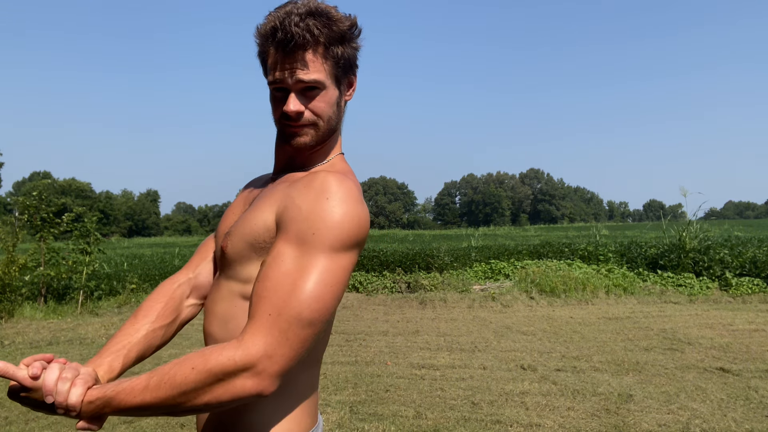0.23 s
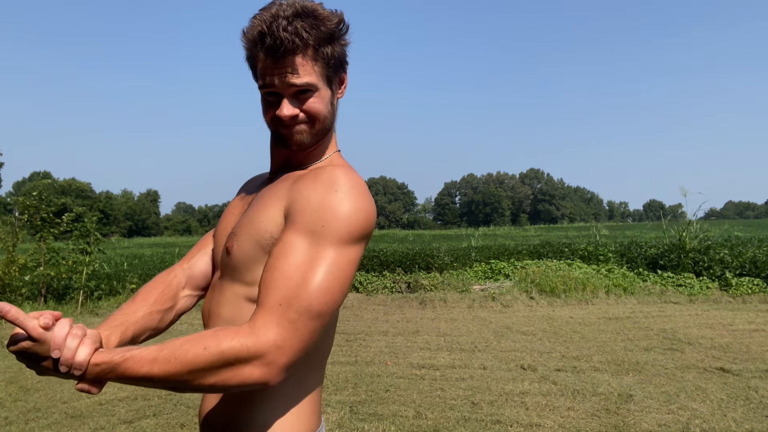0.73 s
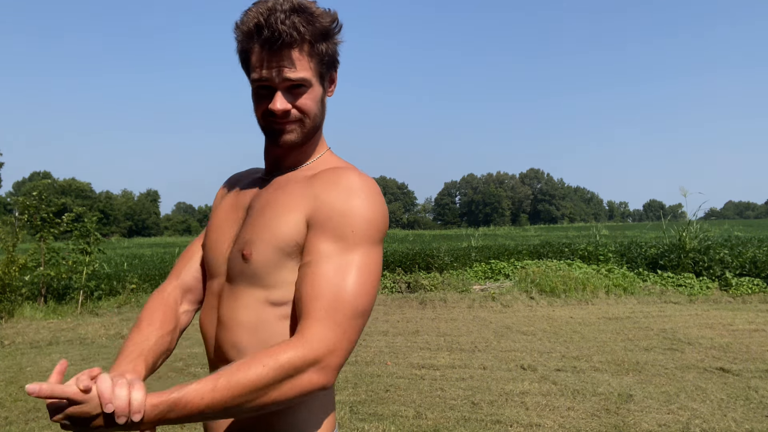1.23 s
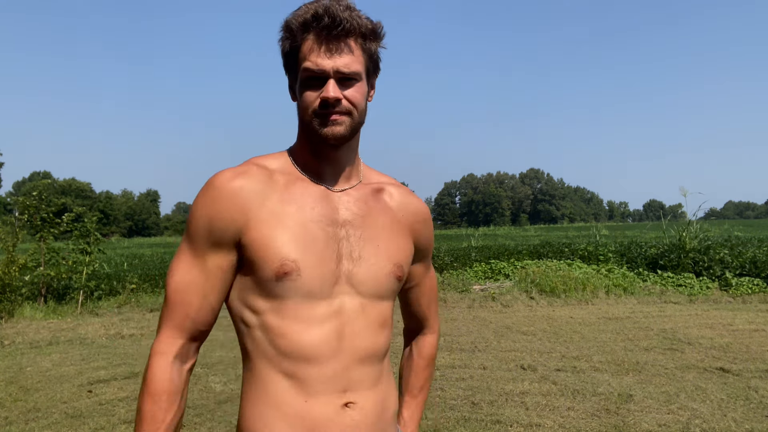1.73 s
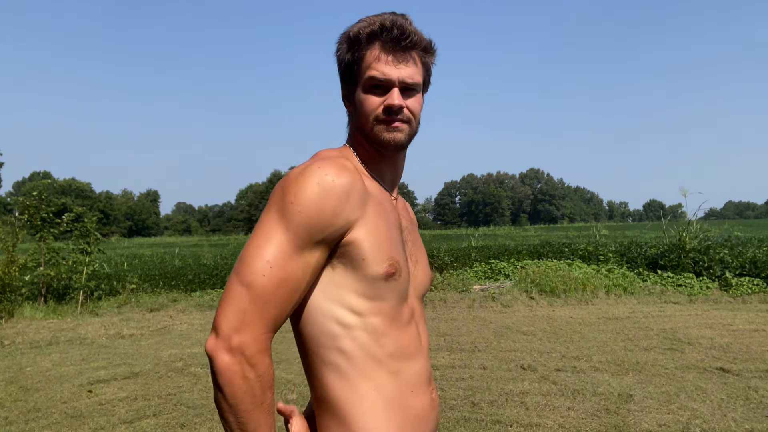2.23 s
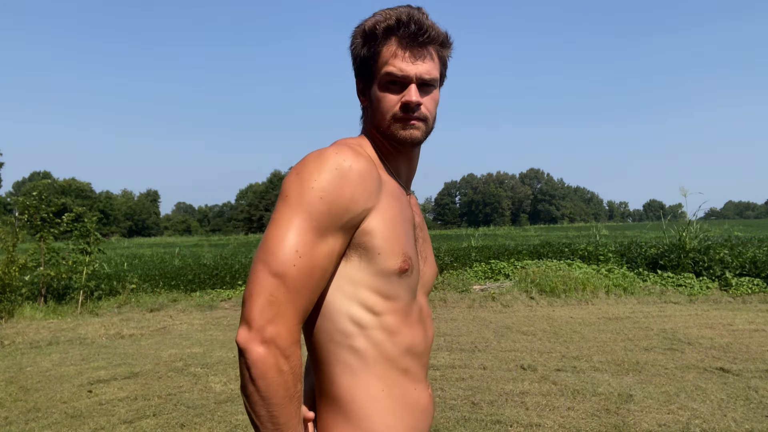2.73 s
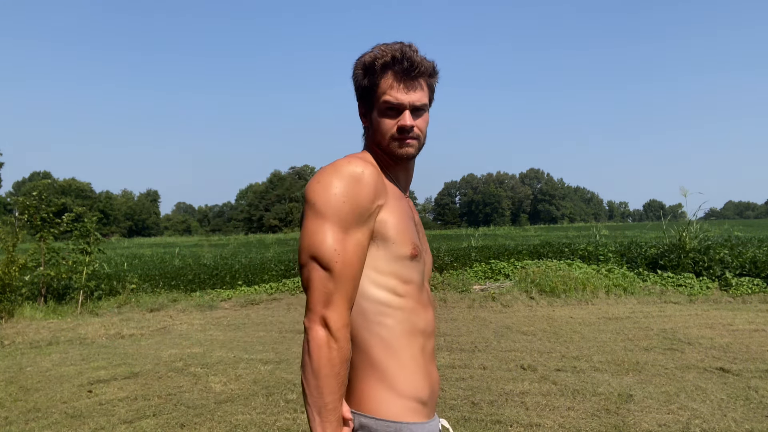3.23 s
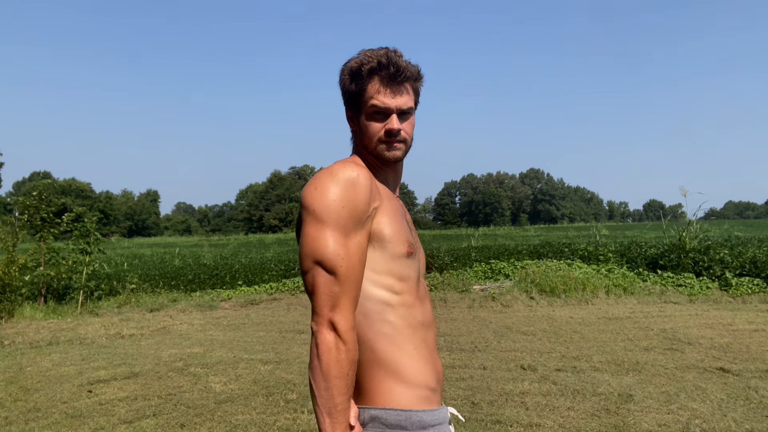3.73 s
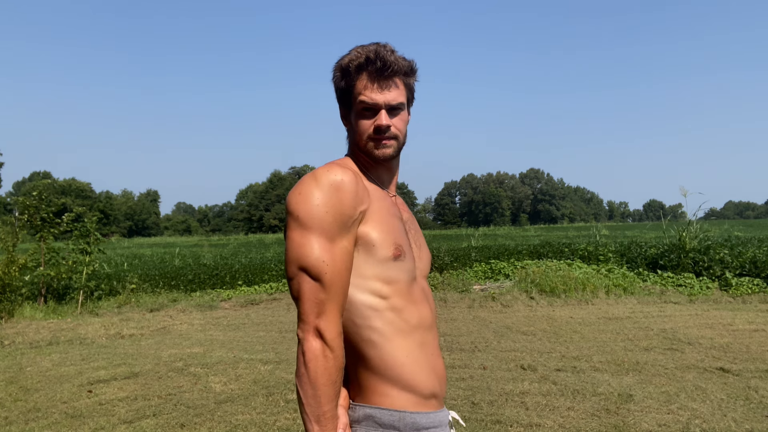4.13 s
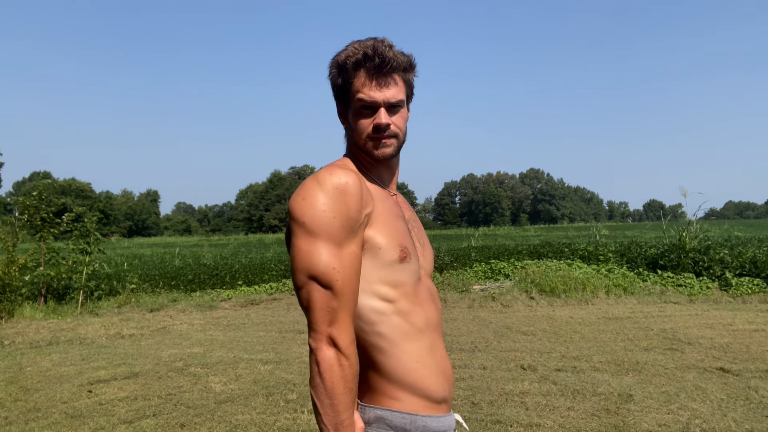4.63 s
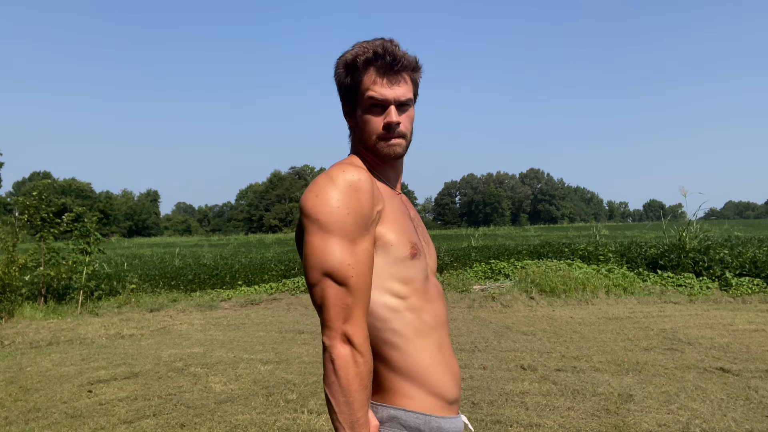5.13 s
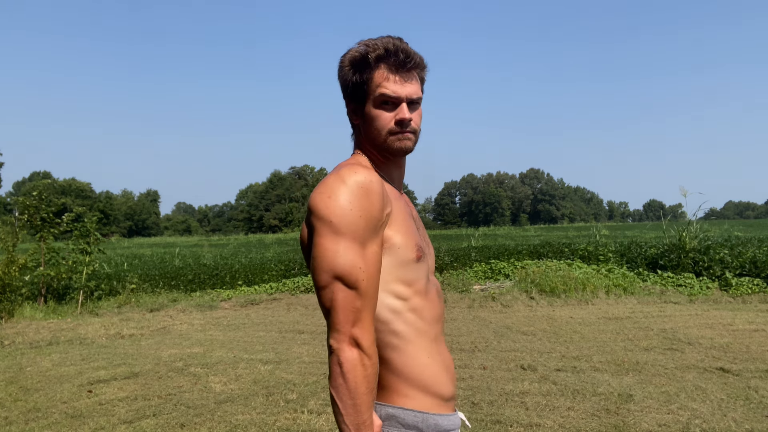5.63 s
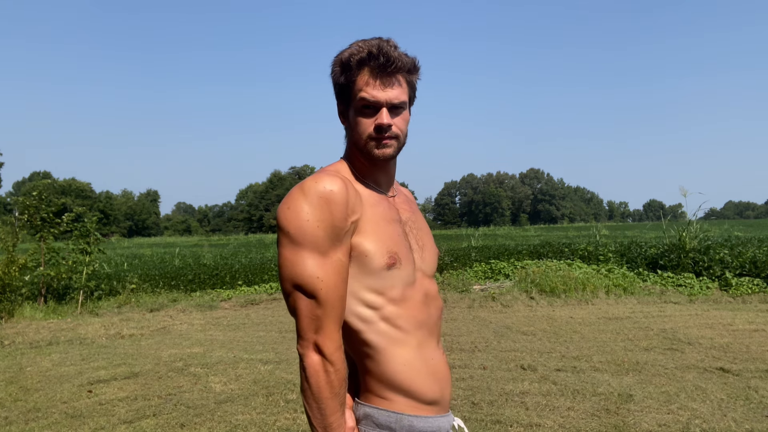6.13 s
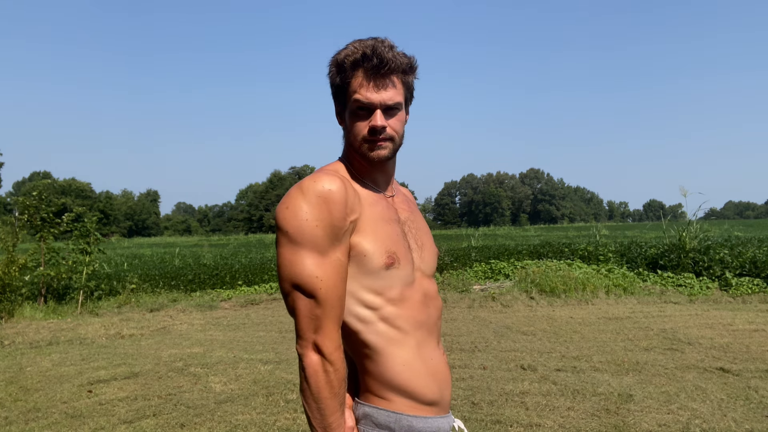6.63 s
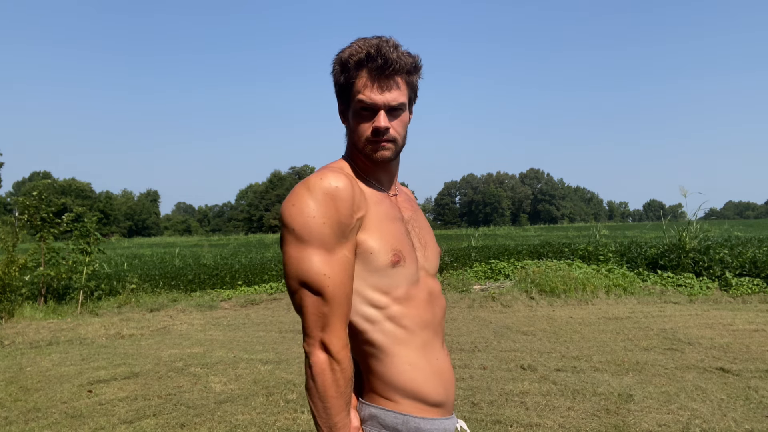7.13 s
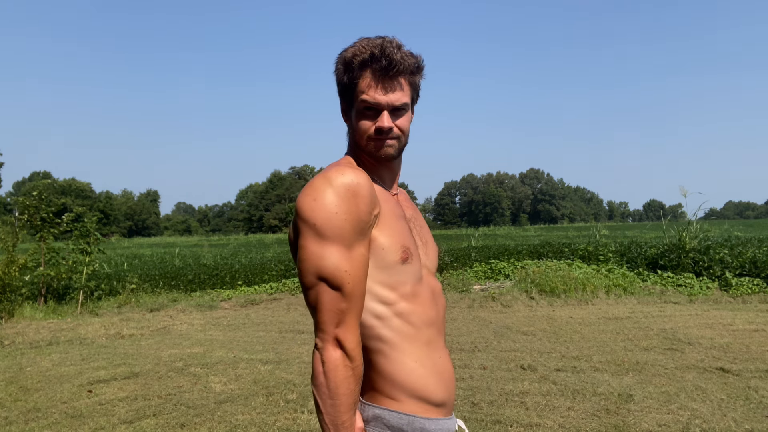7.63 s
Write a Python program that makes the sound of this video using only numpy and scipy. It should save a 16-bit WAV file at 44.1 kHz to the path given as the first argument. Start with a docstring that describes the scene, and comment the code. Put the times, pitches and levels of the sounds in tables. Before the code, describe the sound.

Insects hiss and trill steadily across a rural yard, while far traffic rumbles and someone briefly rustles cloth and dry grass.

```python
"""A wide chorus of far insects fills a mown yard beside a field on a still summer day.
Crickets trill and chirp by rubbing their wings, one short ring per stroke, and a katydid lisps.
Distant traffic rumbles, machinery hums and whines faintly, and one engine speeds up.
Close to the two microphones someone shifts about, rustling cloth and snapping dry grass."""
import sys
import numpy as np
from scipy import signal
from scipy.fft import rfft, irfft, next_fast_len
from scipy.io import wavfile

SR = 44100
rng = np.random.default_rng(int(sys.argv[2]) if len(sys.argv) > 2 else 0)


def materialize(psi):
    """Save the field psi as 16-bit PCM at rate SR to the path in sys.argv[1].

    A 1-D psi becomes a single channel; in a 2-D psi each row is a channel.
    """
    bounded = np.clip(np.atleast_2d(psi).T, -1, 1)
    quanta = np.round(bounded * 32767).astype(np.int16)
    wavfile.write(sys.argv[1], SR, quanta)


N = 347067
T = np.arange(N) / SR
SIZE = 2 * next_fast_len(N // 2 + 1, True)
HZ = np.fft.rfftfreq(SIZE, 1 / SR)


def insect_chorus(level_db=-49, lull_db=-1, shimmer_db=0.75, sizzle_db=-61):
    """Countless far insects merge into a bright, shimmering hiss with a thin sizzle on top."""
    # Each row: frequency in Hz, strength there in dB.
    body_colour = [(1500, -43), (2050, -14), (2400, -4), (2650, -0.9), (3300, 0.5), (4000, 1.5),
                   (4500, 1.5), (5600, 3), (6600, 0.5), (7200, -2.5), (8150, -4.5), (8900, -12),
                   (10800, -16), (13500, -12.5), (13950, -64)]
    sizzle_colour = [(12400, -44), (13300, -21), (14200, -3), (15000, 2), (15600, -6), (16000, -10)]
    # Each row: frequency in Hz, how alike the two sides are from 0 to 1.
    likeness = [(1500, 0), (2200, .1), (2500, .5), (3400, .18), (4200, .2), (4800, .05), (5600, .08),
                (6200, .2), (6800, .5), (7100, .95), (7800, .9), (8400, .99), (13300, .99)]
    # Each row: frequency in Hz, how far the left wave is ahead in radians.
    left_lead = [(1500, -.6), (2500, -1.5), (3300, -.7), (4000, .8), (4900, -1.2), (6300, 0), (7000, -.2),
                 (7800, 0), (11700, 0), (12600, 1.2), (13300, np.pi)]
    # Each row: frequency in Hz, how much louder the left is in dB.
    left_louder = [(1500, 4), (2700, 4), (4000, 2), (5000, 3.5), (6000, -0.5), (6600, 1), (7600, -0.5)]
    body = diffuse(by_pitch(body_colour), by_pitch(likeness), by_pitch(left_lead), by_pitch(left_louder))
    body *= gain_of(level_db + lull_db * lull() + shimmer_db * drift(40))
    sizzle = evened(wave(white() * gain_of(by_pitch(sizzle_colour))))
    sizzle *= gain_of(sizzle_db + 3 * drift(14))
    # A thin, very high hiss, opposite in the left and right channels, sounds wide.
    return body + np.array([sizzle, -sizzle])


def trilling_crickets(level_db=-55.5, pitch_hz=5100, strokes_per_s=69.5, rest_db=-11, under_db=-62.5):
    """Fast wing strokes make a dry trill that dips three times; a slower neighbour carries on under it."""
    # Each row: start and end of a short rest in seconds.
    rests = [(1.46, 1.69), (3.95, 4.16), (7.3, 7.74)]
    strokes = np.cumsum(strokes_per_s * (1 + .022 * drift(4) + .04 * drift(40))) / SR
    song = wing_strokes(strokes, pitch_hz * (1 + .014 * drift(90) + .004 * drift(8)), sag=.085, duty=.48)
    resting = sum(during(start, end, fade_s=.036) for start, end in rests)
    song *= gain_of(rest_db * resting + 1.3 * drift(20))
    under_strokes = 60 * (T + .006 * drift(6))
    under_song = wing_strokes(under_strokes, hz=5060 * (1 + .014 * drift(90)), sag=.06, duty=.6)
    near = outdoors(song, lead=-1.2, side_db=2.7, scatter_db=-4.5, echo_s=.15)
    under = outdoors(under_song, lead=-1.2, side_db=2, scatter_db=1, echo_s=.3)
    return gain_of(level_db) * near + gain_of(under_db) * under


def chirping_crickets(level_db=-65.5, lull_db=-9, first_chirp_s=.012):
    """Neighbours chirp in step, about nine times a second, and stand out once the chorus has gathered."""
    # Each row: pitch in Hz, level in dB added to level_db.
    chirpers = [(3535, -1), (3638, -1.5), (3775, -5)]
    # Each row: time in seconds, chirps per second.
    chirp_rate = [(0, 8.8), (2, 8.94), (4, 8.75), (5, 8.75), (6, 8.6), (7.87, 8.66)]
    beat = np.cumsum(by_time(chirp_rate)) / SR - chirp_rate[0][1] * first_chirp_s
    out = np.zeros((2, N))
    for hz, db in chirpers:
        own_beat = beat + .02 * drift(3)
        song = wing_strokes(own_beat, hz * (1 + .003 * drift(60) + .002 * drift(2)), sag=.005, duty=.6)
        song *= gain_of(lull_db * lull() + 1.5 * drift(90) + 1.2 * drift(5))
        out += gain_of(db) * outdoors(song, lead=.2, side_db=2, scatter_db=-6, echo_s=.3)
    return gain_of(level_db) * out


def far_crickets(boost_db=1.26, uneven_db=2):
    """Single trills, smeared by distance, flit in and out of the chorus; most of them swell with it."""
    # Each row: pitch in Hz, level in dB before the boost, change in dB while the chorus holds back.
    singers = [(2670, -74.5, -1), (2866, -77, -4), (3126, -71.5, 2), (3235, -74, 0), (3390, -74, -2),
               (3545, -67, -7), (3644, -65, 0.5), (3770, -73.5, -4), (3870, -70, -4), (3950, -69, -8),
               (4090, -75.5, 7), (4140, -76, -2), (4488, -76, -4), (5960, -70, -4), (6060, -71, -4),
               (6176, -65, -0.5), (6340, -66, -4), (6510, -63.5, -5), (6730, -66.5, -5), (6870, -63, -10)]
    out = np.zeros((2, N))
    for hz, db, lull_db in singers:
        strokes_per_s, wander = rng.uniform(35, 65), drift(15.5)
        pitch_hz = hz * (1 + .003757 * drift(25.5) + .001 * drift(1))
        song = wing_strokes(strokes_per_s * (T + .0037 * wander), pitch_hz, sag=.004926, duty=.94)
        song *= gain_of(uneven_db * wander)
        smeared = outdoors(song, lead=0, side_db=1.5, scatter_db=3.5, echo_s=.52)
        out += gain_of(db + lull_db * lull()) * smeared
    return out * gain_of(boost_db)


def katydid(level_db=-67.5, between_db=-9, pitch_hz=9780, width_hz=380, half_lisp_s=.033):
    """A rasping wing makes four or five soft, high lisps a second over the blur of others further off."""
    # Each row: middle of a lisp in seconds, level in dB added to level_db.
    lisps = [(.18, -4), (.41, -9), (.63, -11), (.81, -8), (1.1, -5), (1.36, 0), (1.57, 0), (1.91, -1),
             (2.13, 2), (2.34, 4.5), (2.56, -2), (2.79, 0), (3.03, -3), (3.26, 0), (3.48, -1), (3.76, -1),
             (3.96, -1), (4.17, 2), (4.38, 0), (4.6, 2), (4.82, 1), (5.02, -1), (5.2, -3), (5.4, -5),
             (5.61, -1), (5.8, -1), (6.03, -3), (6.23, -3), (6.49, -3), (6.68, -1), (6.89, -2), (7.11, -6),
             (7.34, -2), (7.62, 1)]
    rasp = evened(wave(white() * np.exp(-.5 * ((HZ - pitch_hz) / width_hz) ** 2)))
    swells = sum(gain_of(db) * bump((T - s) / half_lisp_s) for s, db in lisps)
    return gain_of(level_db) * rasp * np.hypot(swells, gain_of(between_db))


def traffic(level_db=-50, growth_db_per_s=.01, lag_s=.00054, swell_db=1.5):
    """Far roads and air make a low rumble that reaches the left microphone first."""
    # Each row: frequency in Hz, strength there in dB.
    colour = [(20, -40), (30, -24), (42, -4), (58, -2.5), (80, -1.5), (105, -7), (150, -13.4), (205, -18.5),
              (270, -23), (420, -27), (560, -28.3), (720, -27.5), (810, -29.5), (930, -28.5), (1400, -40.5),
              (2000, -43.5), (4000, -71)]
    # Each row: frequency in Hz, how alike the two sides are from 0 to 1.
    likeness = [(90, .97), (170, .9), (350, .74), (550, .55), (900, .35), (2000, .15)]
    # Each row: frequency in Hz, how much louder the left is in dB.
    left_louder = [(80, 3.4), (170, 3.3), (350, 0.63), (2000, 2.5)]
    rumble = diffuse(by_pitch(colour), by_pitch(likeness), 2 * np.pi * HZ * lag_s, by_pitch(left_louder))
    return rumble * gain_of(level_db + growth_db_per_s * T + swell_db * drift(9.9))


def engines(hum_hz=118.6, drone_hz=77, pull_away_s=5.42, roar_hz=800, roar_rise_s=1.6):
    """Only low engine notes carry this far: a hum, and a vehicle that drones, then pulls away."""
    # Each row: time in seconds, firings per second of the engine that pulls away.
    firing_rate = [(5.49, 52.7), (5.8, 63.1), (6.02, 67.9), (6.6, 74.8), (6.96, 81.7), (7.2, 81.8),
                   (7.62, 72.3), (7.87, 71.8)]
    # Each row: time in seconds, level in dB before the left-right balance.
    pulling_level = [(5.35, -77), (5.48, -50), (5.63, -48), (5.86, -51), (6.01, -44.5), (6.12, -54),
                     (6.39, -44), (6.6, -53), (6.73, -46.5), (6.95, -41.5), (7.15, -47), (7.42, -52.5),
                     (7.7, -48.5), (7.87, -50)]
    hum_level = [(0, -64.5), (1.2, -61), (2, -58.5), (2.8, -64.5), (4, -68.5), (5.3, -60.5), (6.3, -58.5),
                 (7.87, -64)]
    phase = 2 * np.pi * np.cumsum(by_time(firing_rate)) / SR
    pulling = (np.sin(phase) + gain_of(-24) * np.sin(2 * phase)) * gain_of(by_time(pulling_level))
    road_roar = diffuse(-12 * np.log2((HZ + 1) / roar_hz) ** 2, likeness=.15, lead=0, side_db=1)
    road_roar *= gain_of(-72) * np.clip((T - pull_away_s) / roar_rise_s, 0, 1)
    hum = tone(hum_hz + .94 * drift(2.25)) * gain_of(by_time(hum_level) + 2 * drift(1.3))
    drone = tone(drone_hz + 2.53 * drift(1.97)) * gain_of(-58 + .34 * drift(2.6))
    drone *= np.clip((pull_away_s - T) / .2 + 1, 0, 1)  # ends with the gear change
    balance = gain_of([[1.6], [-1.8]])
    return np.sqrt(2) * (pulling + hum + drone) * balance + road_roar


def machinery(waver_hz=1.91, swell_db=4.5):
    """Thin whines of far machines come and go on the air."""
    # Each row: pitch in Hz, level in dB that the whine swells around.
    whines = [(199, -73.5), (243, -81.5), (292, -81.5), (352, -85.5), (411, -82), (478, -85.5)]
    out = sum(tone(hz + waver_hz * drift(4.3)) * gain_of(db + swell_db * drift(1.26)) for hz, db in whines)
    return out * gain_of([[1], [-1]])


def rustling(catches_per_s=2500, spread_db=2, stir_db=-67):
    """Cloth and grass rub in swells of tiny catching fibres, over a faint stir as the body turns."""
    # Each row: frequency in Hz, strength there in dB.
    cloth = [(120, -20), (230, -7), (370, 5.5), (750, 3), (1200, -2), (1850, -4.5), (2600, -11),
             (7000, -33), (9500, -20.5), (12500, -13), (14000, -60)]
    # Each row: peak in seconds, level in dB, rise and fall in seconds, brightness in dB per octave.
    brushes = [(1.3, -65, 0.09, 0.092, 0), (1.63, -63, 0.09, .05, 0), (1.79, -62, 0.073, 0.055, 7),
               (1.93, -60.5, 0.069, 0.036, 1.5), (2.24, -60.3, 0.058, 0.14, 5),
               (2.266, -54.5, .018, .017, 2.5), (2.287, -56.5, 0.011, 0.011, -1),
               (2.55, -58, 0.029, 0.04, -4.5), (2.81, -69, .04, .05, -2), (3.19, -58.5, 0.048, 0.044, 2),
               (3.256, -59, 0.033, 0.035, 0.5), (3.305, -57.5, 0.045, 0.093, 5)]
    colour_db = by_pitch(cloth)
    sizes = gain_of(spread_db * np.minimum(rng.exponential(1, N), 4))
    catches = sizes * rng.choice([-1, 1], N) * (rng.random(N) < catches_per_s / SR)
    grains = evened(wave(rfft(catches, SIZE) * gain_of(colour_db)))
    smooth = gain_of(-3) * diffuse(colour_db, likeness=.33, lead=0, side_db=2)
    rubbing = rfft(grains + smooth, SIZE)
    octaves = np.log2(np.clip(HZ, 250, 2500) / 1000)
    out = diffuse(colour_db + 2 * octaves, likeness=.17, lead=0, side_db=1.1)  # the faint stir
    out *= during(1.06, 3.06, fade_s=.18) * gain_of(stir_db + 1.8 * drift(10))
    for s, db, rise, fall, brightness in brushes:
        swell = bump((T - s) / np.where(T < s, rise, fall))
        out += gain_of(db) * swell * evened(wave(rubbing * gain_of(brightness * octaves)))
    return out


def snapping_grass(width_octaves=.49, rise_s=.0006, decay_s=.0055):
    """Dry stalks give way one by one, each a short tick of its own colour."""
    # Each row: start in seconds, level in dB, centre frequency in Hz.
    snaps = [(1.157, -61, 1100), (1.227, -56, 1300), (1.242, -53.5, 650), (1.304, -54, 620),
             (1.358, -53, 750), (1.787, -47.5, 740), (1.794, -50, 1900), (1.936, -58, 900),
             (2.259, -53, 1200), (2.271, -53, 800), (2.286, -51, 1100), (2.574, -60, 800),
             (3.252, -54, 700), (3.42, -52, 1490)]
    out, noise = np.zeros(N), white()
    for s, db, hz in snaps:
        distance = abs(np.log2((HZ + 1) / hz)) / width_octaves
        colour = np.exp(-.5 * np.minimum(distance, 10) ** 2)
        tick = np.clip((T - s) / rise_s, 0, 1) * np.exp(-np.minimum(abs(T - s) / decay_s, 20))
        out += gain_of(db) * tick * evened(wave(noise * colour))
    return out


def wing_strokes(count, hz, sag, duty):
    """Each closing rings the wings for a share (duty) of the beat; the pitch sags as the stroke slows."""
    progress = np.minimum(count % 1 / duty, 1)
    return np.sin(np.pi * progress) * tone(hz * (1 - sag * (progress - .5)))


def lull(gather_s=2.06, ease_at_s=6.75, ease_s=.9):
    """How much the insects hold back: 0 in full song, about 1 at the start and the end."""
    return np.maximum(1 - T / gather_s, 0) + np.maximum((T - ease_at_s) / ease_s, 0)


def outdoors(song, lead, side_db, scatter_db, echo_s):
    """One singer in stereo: the direct sound plus its scatter from leaves and trees."""
    t = T[:SR // 2]
    echoes = rng.standard_normal((2, len(t))) * gain_of(-60 * t / echo_s)
    scatter = signal.fftconvolve(song[None], echoes / np.linalg.norm(echoes[0]), axes=1)[:, :N]
    direct = np.array([song, wave(rfft(song, SIZE) * np.exp(-1j * lead))])
    return evened((direct + gain_of(scatter_db) * scatter) * gain_of([[side_db / 2], [-side_db / 2]]))


def diffuse(colour_db, likeness, lead, side_db):
    """Noise from all around; the left side is ahead by lead radians and louder by side_db."""
    left = white()
    right = (likeness * left + np.sqrt(1 - likeness ** 2) * white()) * np.exp(-1j * lead)
    pair = np.array([left * gain_of(side_db / 2), right * gain_of(-side_db / 2)])
    return evened(wave(pair * gain_of(colour_db)))


def drift(rate):
    """A random wobble of typical size 1 that changes up to about rate times a second."""
    hz = HZ[HZ < 900]
    noise = rng.standard_normal(len(hz)) + 1j * rng.standard_normal(len(hz))
    slow = irfft(noise * np.exp(-(hz / rate) ** 2) * (hz > 0))
    return evened(np.interp(T, np.linspace(0, SIZE / SR, len(slow)), slow))


def gain_of(db):
    """Turns decibels into a factor."""
    return 10 ** (np.asarray(db) / 20)


def evened(x):
    """Scales a signal to a typical size (rms) of 1."""
    return x / np.sqrt(np.mean(x ** 2) + 1e-20)


def by_pitch(rows):
    """Joins a table's rows into a value for every frequency."""
    hz, value = np.transpose(rows)
    return np.interp(np.log(HZ + 1), np.log(hz + 1), value)


def by_time(rows):
    """Joins a table's rows into a value for every sample."""
    return np.interp(T, *np.transpose(rows))


def tone(hz):
    """A pure tone that follows a changing pitch."""
    return np.sin(2 * np.pi * np.cumsum(hz) / SR)


def wave(spectrum):
    """Turns a spectrum into sound."""
    return irfft(spectrum)[..., :N]


def white():
    """The spectrum of fresh white noise."""
    return rng.standard_normal(len(HZ)) + 1j * rng.standard_normal(len(HZ))


def bump(x):
    """A smooth hill of height 1 around x = 0."""
    return np.exp(-np.minimum(abs(x), 10) ** 2)


def during(start, end, fade_s):
    """1 from start to end and 0 outside, with sloping edges."""
    return np.clip(np.minimum(T - start, end - T) / fade_s + .5, 0, 1)


def scene():
    """High insects, low traffic and small movements close by."""
    insects = insect_chorus() + trilling_crickets() + chirping_crickets() + far_crickets() + katydid()
    return insects + traffic() + engines() + machinery() + rustling() + snapping_grass()


def record(dry):
    """Cuts away the very highest treble."""
    low_pass = signal.firwin(511, cutoff=15750, window=("kaiser", 9), fs=SR)
    return signal.oaconvolve(dry, low_pass[None], "same")


dry = scene()
out = record(dry)
materialize(out)
```